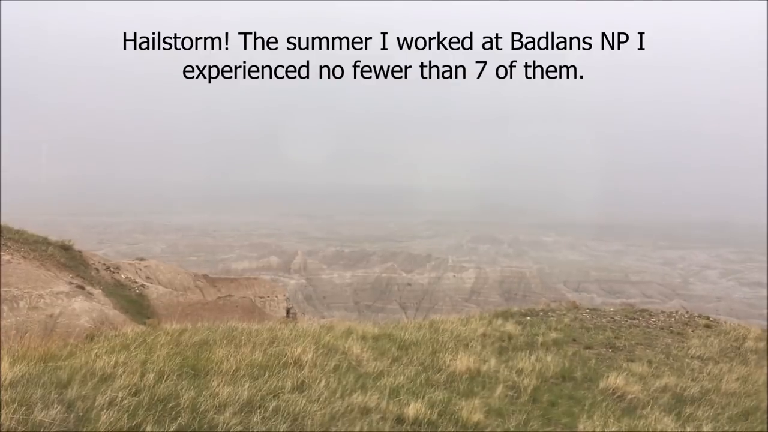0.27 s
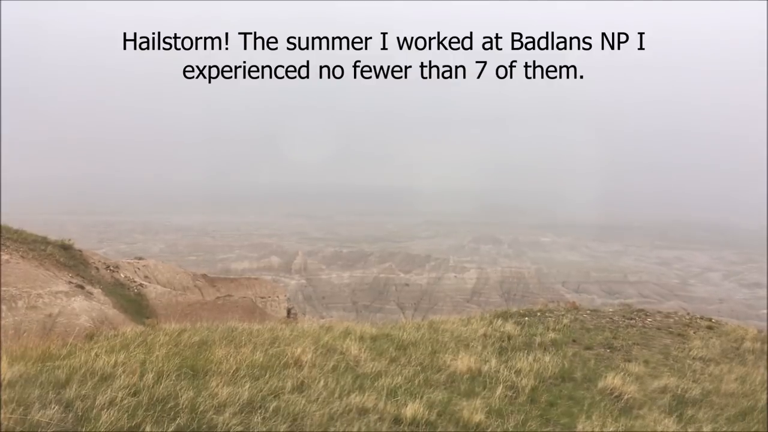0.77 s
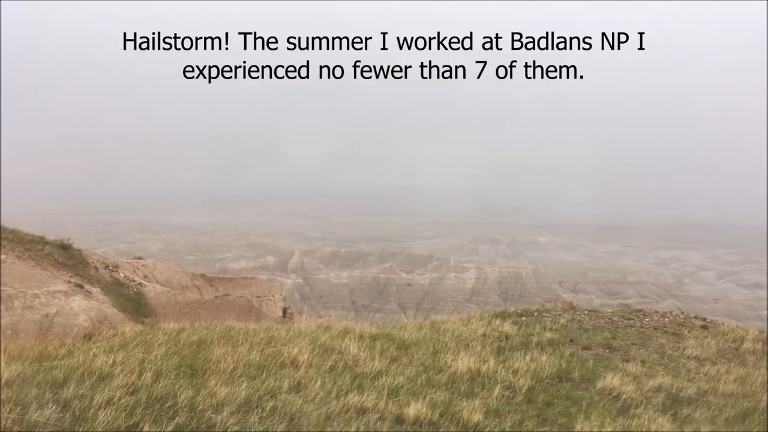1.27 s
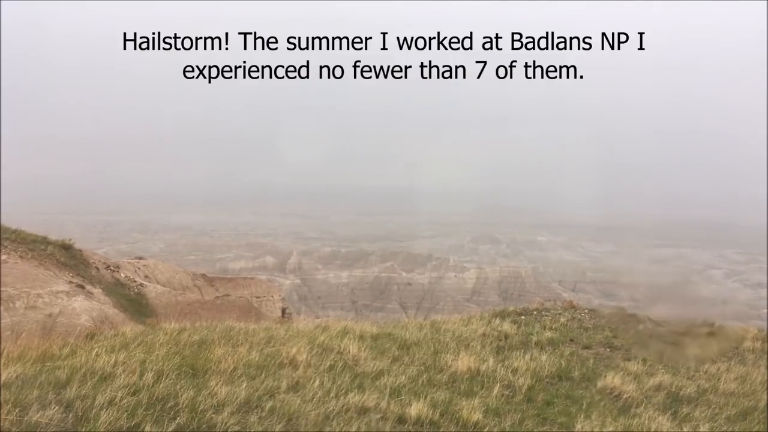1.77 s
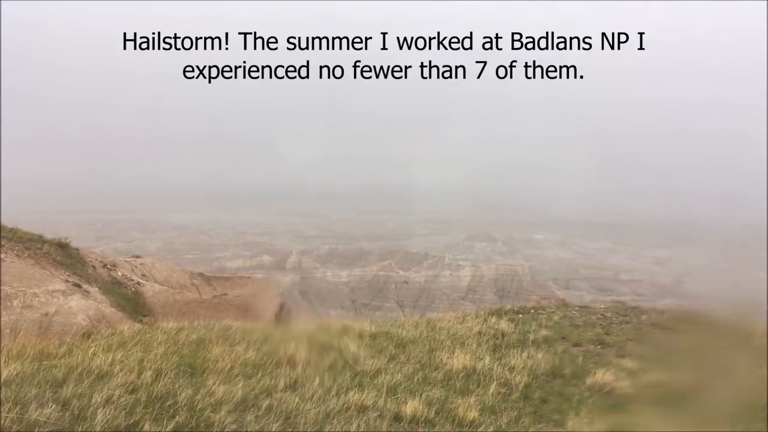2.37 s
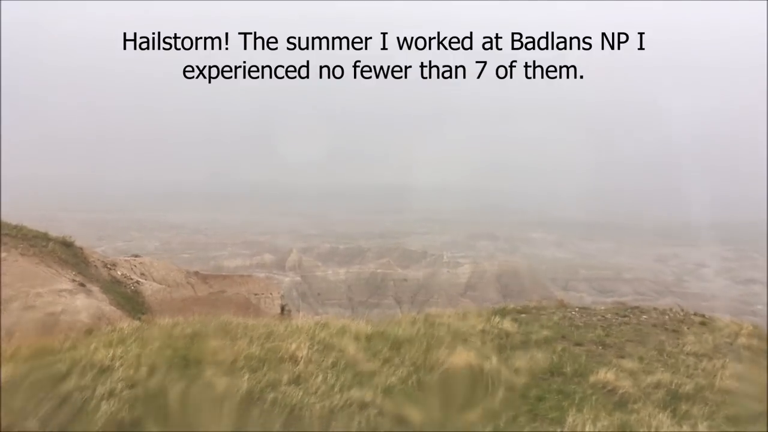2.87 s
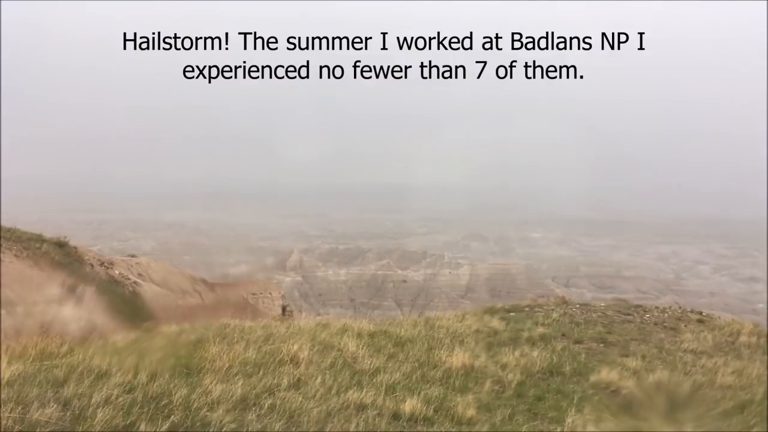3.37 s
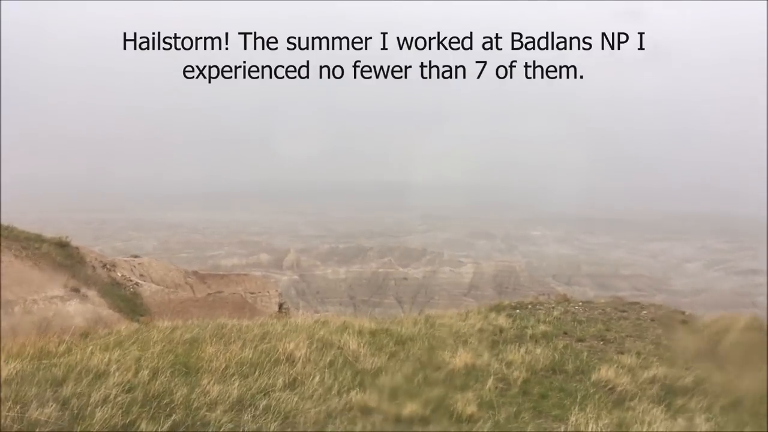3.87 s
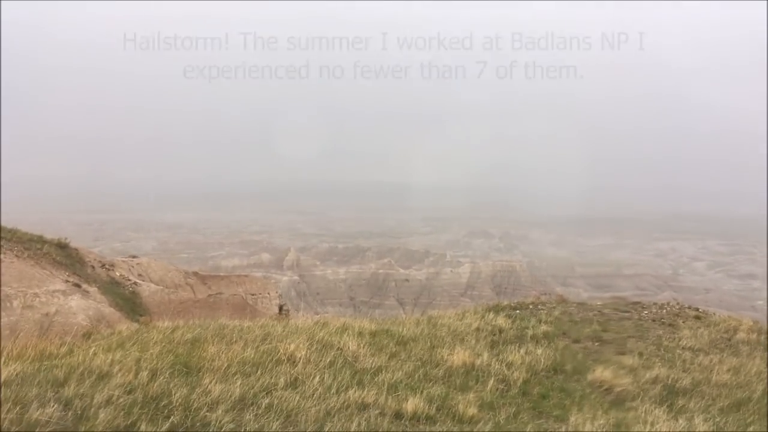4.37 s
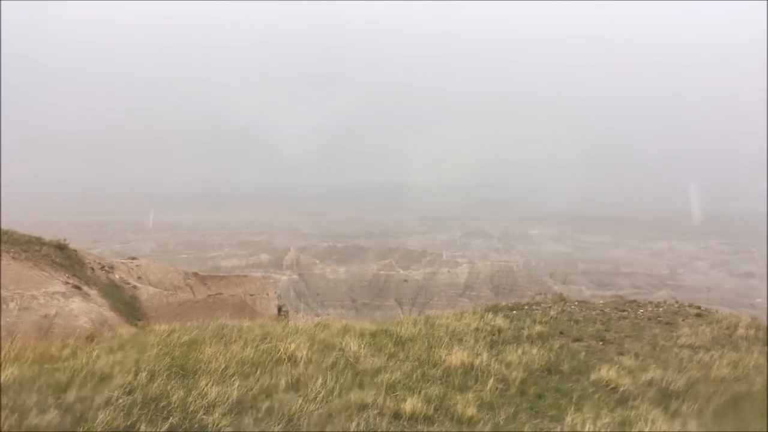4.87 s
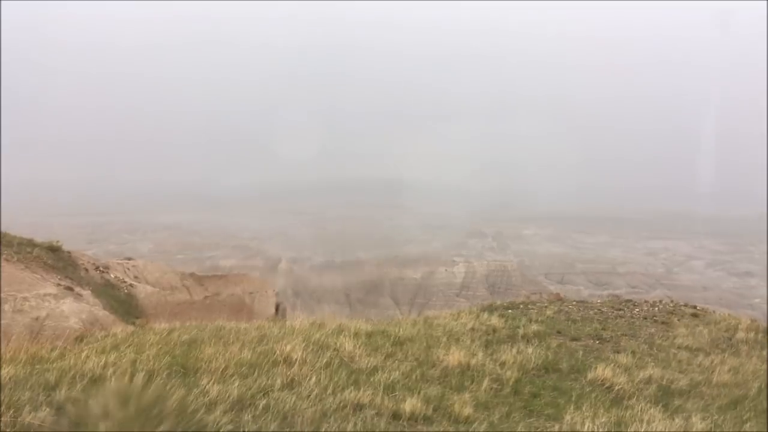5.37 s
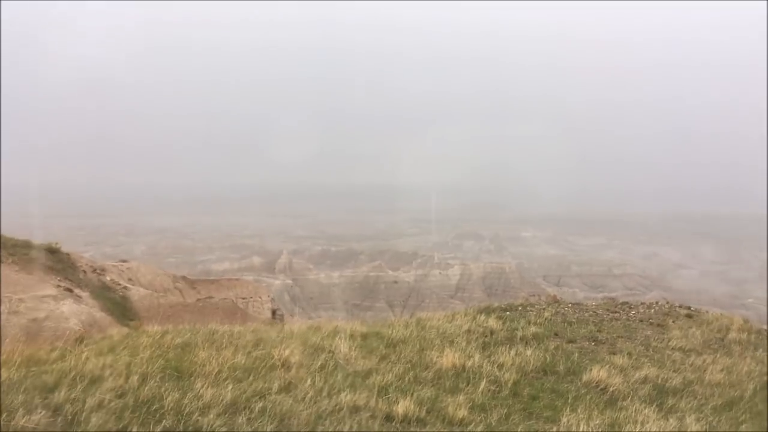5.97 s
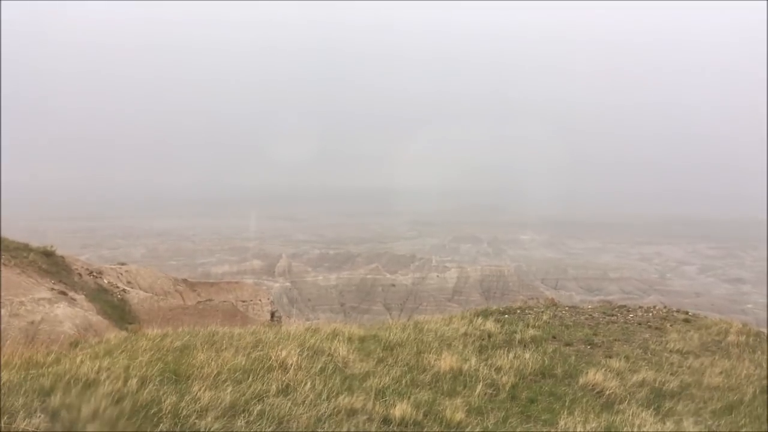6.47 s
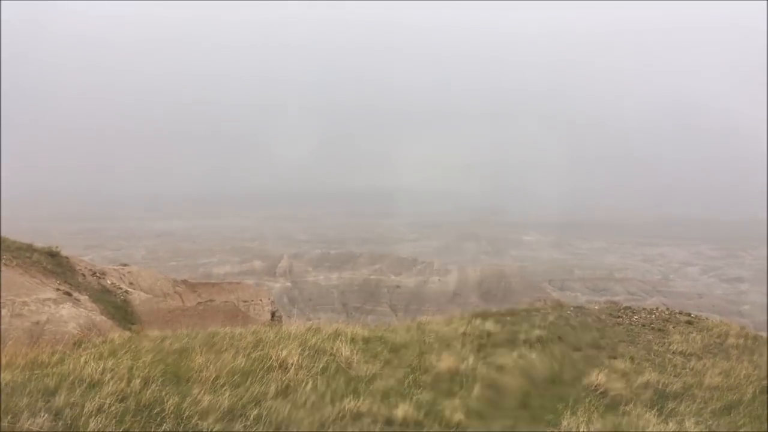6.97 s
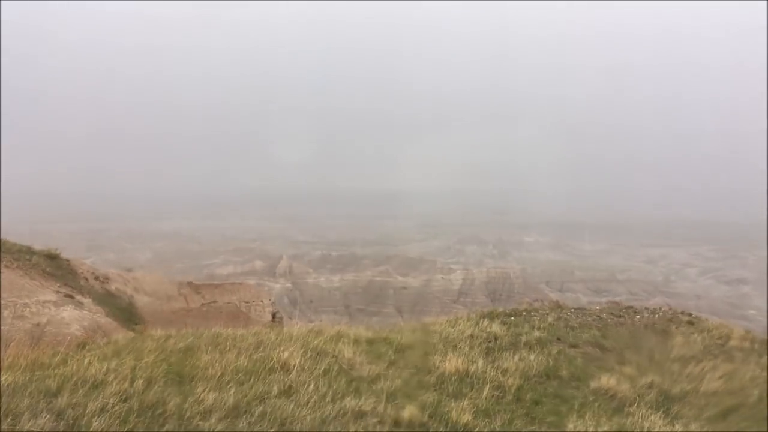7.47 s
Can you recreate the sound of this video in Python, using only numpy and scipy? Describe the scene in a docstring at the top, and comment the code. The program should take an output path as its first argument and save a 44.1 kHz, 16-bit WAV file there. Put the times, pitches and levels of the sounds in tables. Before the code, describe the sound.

Outdoors beside a hollow shelter, a dense patter of hail on grass is heard from the start, backed by a distant rustling wash and dull, low drumming with occasional thuds. Large hailstones soon strike close to the microphone in irregular clusters, tocking on turf and cracking brightly on harder spots. After several brief surges the hail thins and fades to a few faint ticks.

```python
"""Hail on a grassy ridge, heard from beside a hollow shelter. From the start, far stones merge into a
rustling wash over the slope, smaller ones patter a few metres off, and the shelter drums softly and
thuds now and then. Within half a second big stones are landing by the microphone with short, hard
tocks; some strike hard spots and crack sharply. The shower comes in flurries and slowly eases,
then dies away over the last two seconds."""
import sys
import numpy as np
from scipy import signal
from scipy.fft import rfft, irfft
from scipy.io import wavfile
from scipy.ndimage import uniform_filter1d

SR = 44100
rng = np.random.default_rng(int(sys.argv[2]) if len(sys.argv) > 2 else 0)


def wav_out(sig):
    """Save sig, one row per channel (or a flat mono array), as 16-bit PCM at SR to the path in sys.argv[1]."""
    wavfile.write(sys.argv[1], SR, np.round(np.clip(np.atleast_2d(sig).T, -1, 1) * 32767).astype(np.int16))


N = 340008
CENTRE_HZ = 3120  # pitch of a usual stone's tock


def undb(db):
    """Decibels to gain."""
    return 10 ** (np.asarray(db) / 20)


def unit(x):
    """Scale to rms 1."""
    return x / np.sqrt(np.mean(x ** 2))


def add(out, start_s, x):
    """Mix x into out from start_s on."""
    i = int(start_s * SR)
    out[i:i + len(x)] += x[:len(out) - i]


def ring(colour, stretch=1, size=1024):
    """Causal impulse response of a colour (freq_hz, level_db), its frequencies scaled by stretch."""
    hz, db = np.transpose(colour)
    bin_hz = np.maximum(np.arange(size // 2 + 1) * SR / size, 1)
    gain = undb(np.interp(np.log(bin_hz), np.log(hz * stretch), db))
    cepstrum = irfft(np.log(gain))
    cepstrum[1:size // 2] *= 2  # fold to minimum phase
    cepstrum[size // 2 + 1:] = 0
    return irfft(np.exp(rfft(cepstrum)))


def sound(force, response):
    """Let a force play through a response."""
    return signal.fftconvolve(force, response)[:len(force)]


def walk(rate_hz):
    """Slow drift: random levels held 1 / rate_hz seconds and smoothed twice."""
    hold = int(SR / rate_hz)
    steps = np.repeat(rng.standard_normal(N // hold + 1), hold)
    return unit(uniform_filter1d(uniform_filter1d(steps, hold), hold)[:N])


def impacts(per_s, spread_db, span=4):
    """Random impacts, most of them faint; the biggest lie span spreads above the smallest."""
    when, rarity, side = rng.random((3, N))
    size_db = -spread_db * np.log(rarity + np.exp(-span))
    return (when < per_s / SR) * undb(size_db) * np.sign(side - .5)


def contact(crush_s, scatter, scatter_s, size=2048):
    """Force of one landing: it builds as stalks are crushed, lets go, and the ground scatters it."""
    t = np.arange(1, size + 1) / SR
    stalks, ground = rng.standard_normal((2, size))
    stalks = stalks * np.abs(stalks) * np.sqrt(t) * np.exp(-t / crush_s)
    ground = ground * np.exp(-t / scatter_s)
    return stalks / np.linalg.norm(stalks) + scatter * ground / np.linalg.norm(ground)


def blow(force, response, size=260):
    """One hit, with rms 1 over its first few milliseconds."""
    x = sound(force, response)
    return x / np.sqrt(np.mean(x[:size] ** 2))


def shower(swell, dying, ease_db_per_s=0.59, fade_start_s=5.59, fade_end_s=8.41):
    """Gain of the easing hail; swell and dying set how strongly it follows flurries and final fade."""
    # flurries of thicker hail: centre_s, half_length_s, relative_swell_db
    flurries = [(0.244, 0.14, 4.5), (1.0, 0.28, 2.3), (1.604, 0.12, 1), (3.01, 0.17, 4), (3.904, 0.19, 4.5),
                (4.437, 0.24, 2.5), (5.262, 0.4, 2.5), (6.183, 0.085, 3)]
    t = np.arange(N) / SR
    flurry_db = sum(db * np.exp(-((t - centre_s) / half_s) ** 2) for centre_s, half_s, db in flurries)
    fade = np.clip((fade_end_s - t) / (fade_end_s - fade_start_s), 0, 1)
    return undb(swell * flurry_db - ease_db_per_s * t) * fade ** dying


def wash(per_s, spread_db, waver_db):
    """Countless far stones merge into a rustle that wavers a little."""
    # the whole slope from afar: freq_hz, level_db
    slope_colour = [(150, -1), (400, 4), (800, 5), (1100, 1.5), (1900, -2.5), (2450, -2.5), (3280, 1),
                    (3900, -10.5), (4900, -16), (5700, -21), (7100, -29), (10300, -28), (12700, -33),
                    (16000, -41)]
    rustle = unit(sound(impacts(per_s, spread_db), ring(slope_colour)))
    return rustle * undb(waver_db * walk(rate_hz=14))


def patter(per_s, spread_db, pitch_spread, patches=14):
    """Smaller stones on patches of turf, each with its own pitch; the grass between blurs the attack."""
    # hail on turf a few metres from the microphone: freq_hz, level_db
    turf_colour = [(300, -15), (1200, -8), (2000, -9.5), (2450, -4.5), (2850, 4), (3300, 6.5), (3900, -8),
                   (4900, -17.5), (5700, -15.5), (7100, -27.5), (8400, -39.5), (10300, -47), (12700, -44),
                   (16000, -34)]
    out = np.zeros(N)
    for patch in np.linspace(-1, 1, patches):
        force = contact(crush_s=0.0016, scatter=0.38, scatter_s=0.012)
        hit = blow(force, ring(turf_colour, stretch=1 + pitch_spread * patch))
        out += sound(impacts(per_s / patches, spread_db), hit)
    return unit(out)


def drumming(per_s, spread_db):
    """Stones on the shelter beside the microphone come through as a dense, dull drumming."""
    # the hollow shelter under hail: freq_hz, level_db
    shelter_colour = [(20, -33), (40, -17), (60, 1.5), (88, -1), (125, -1.5), (185, 0), (290, -4.5),
                      (350, -2), (440, -16), (560, -10), (800, -19.5), (2000, -56.5)]
    return unit(sound(impacts(per_s, spread_db), ring(shelter_colour, size=8192)))


def stone(level_db, pitch_hz, hard_db, crack_trim_db=-2.0):
    """One close stone tocks; a harder spot adds more knock from the soil and a louder, brighter crack."""
    # short ring of ice landing on turf: freq_hz, level_db
    tock_colour = [(100, -36), (1100, -31.5), (1900, -22), (2300, -11.5), (2550, -5), (2850, -8.5),
                   (3250, 0), (3650, -9.5), (4200, -21), (6000, -35), (12000, -59)]
    # the weight of a stone reaching the soil: freq_hz, level_db
    knock_colour = [(100, -9.5), (500, -4.5), (1050, -6.5), (1500, -4), (1850, 3), (2300, -1.5),
                    (3000, -12), (6000, -38)]
    # hard contact of ice on grit: freq_hz, level_db
    crack_colour = [(1500, -25), (3400, -6.5), (4400, 7.5), (5000, 1), (5800, 4), (7000, -10), (7700, -13),
                    (8300, -8.5), (9500, -12), (10300, -21.5), (11400, -14), (12800, -15.5), (13600, -15),
                    (16000, -23)]
    usual_tock_db, usual_hard_db, usual_knock_db = -40, -5.5, -10
    knock_per_db, cushion_per_db = 0.61, 0.5
    harder_db = hard_db - usual_hard_db
    tilt_db_per_octave = 0.05 * harder_db
    grit_hz, grit_db = np.transpose(crack_colour)
    grit_db = grit_db + tilt_db_per_octave * np.log2(grit_hz / CENTRE_HZ)
    grit = ring(np.column_stack([grit_hz, grit_db]))
    ice = ring(tock_colour, stretch=pitch_hz / CENTRE_HZ)
    tock = blow(contact(crush_s=0.00084, scatter=0.47, scatter_s=0.0049), ice)
    knock = blow(contact(crush_s=0.0015, scatter=0.49, scatter_s=0.015), ring(knock_colour))
    crack = blow(contact(crush_s=0.001, scatter=0.34, scatter_s=0.0073), grit)
    cushion_db = cushion_per_db * (level_db - usual_tock_db)  # the turf cushions big stones
    knock_db = usual_knock_db + knock_per_db * harder_db - cushion_db
    return undb(level_db) * (tock + undb(knock_db) * knock + undb(hard_db + crack_trim_db) * crack)


def small_stones(level_db, spread_db, pitch_spread, hard_db, hard_spread_db, count=110):
    """Lighter stones land close by at random moments, on soft and hard spots alike."""
    out = np.zeros(N)
    for slot, (jitter, size, pitch, spot) in enumerate(rng.uniform(-0.9, 1, (count, 4))):
        start_s = (slot + .5 + jitter / 2) / count * N / SR
        pitch_hz = CENTRE_HZ * (1 + pitch_spread * pitch)
        add(out, start_s, stone(level_db + spread_db * size, pitch_hz, hard_db + hard_spread_db * spot))
    return out


def thuds(push_s):
    """A heavy blow pushes the shelter for a few milliseconds and rings its modes."""
    # heavy blows on the shelter: start_s, level_db
    heavy_blows = [(0.137, -51.5), (0.278, -44), (0.625, -54.5), (0.872, -55), (1.211, -57), (1.651, -56),
                   (2.078, -52), (3.862, -55), (4.045, -55), (4.327, -55), (4.681, -56), (5.83, -62),
                   (6.18, -65)]
    # modes of the shelter: pitch_hz, relative_level_db, t60_s
    modes = [(60, -12, .25), (91.6, 1, 0.51), (185.4, 6, 0.23), (272, -7, 0.3), (340, -5, 0.23),
             (556, 5, 0.086)]
    t = np.arange(SR // 2) / SR
    body = sum(undb(db - 60 * t / t60_s) * np.sin(2 * np.pi * hz * t) for hz, db, t60_s in modes)
    body *= 1 - np.exp(-t / push_s)
    body /= np.sqrt(np.mean(body[:SR // 10] ** 2))
    out = np.zeros(N)
    for start_s, level_db in heavy_blows:
        add(out, start_s, undb(level_db) * body)
    return out


def big_stones(gain_db):
    """The big stones land right next to the microphone, each with its own pitch."""
    # landings and how hard a spot each one hits: start_s, relative_level_db, pitch_hz, hardness_db
    strikes = [(0.3949, -33.5, 3260, -2), (0.4066, -34, 3240, -1), (0.5571, -41.5, 3030, -26),
               (0.7012, -37, 3200, -17), (0.7098, -31.5, 2970, -1), (0.7213, -31.5, 3020, -27),
               (0.835, -41.5, 3140, -15), (0.841, -41, 2730, -4), (0.8788, -40.5, 3200, -21),
               (0.9472, -36.5, 3260, -8.5), (0.9922, -40, 3370, -6.5), (1.0571, -39.5, 3150, 0),
               (1.146, -37.5, 3260, -8), (1.2012, -46, 2950, -15), (1.382, -48, 3360, 5),
               (1.395, -44, 3060, -3.5), (1.469, -38, 3300, -23), (1.594, -33.5, 2980, -5.5),
               (1.6549, -39, 3150, -7.5), (1.677, -41, 2990, -8), (1.8702, -36, 3330, -7.5),
               (2.0872, -39.5, 2920, 0.5), (2.1645, -42, 3010, -16), (2.4118, -37, 3160, -8),
               (2.436, -31.5, 3330, -1.5), (2.486, -42, 3000, -5), (2.623, -37.5, 3560, -15),
               (2.9024, -38, 2950, -3), (3.0307, -42, 3320, -7.5), (3.0912, -37, 2820, -2.5),
               (3.1379, -32, 3070, -8), (3.1472, -38.5, 3270, -11), (3.2227, -38.5, 3150, -22),
               (3.2337, -40, 2850, -8), (3.2698, -39.5, 2840, -9.5), (3.324, -41.5, 3240, -8.5),
               (3.422, -35, 2950, -21), (3.717, -42, 2730, -7), (3.7424, -25.5, 2950, -15),
               (3.777, -40, 2940, -10), (3.8057, -37.5, 3200, -5.5), (3.8699, -39, 2900, -1.5),
               (3.875, -48, 3300, 1.5), (3.963, -39.5, 3380, -32), (4.0474, -40.5, 2800, 0.5),
               (4.1393, -36.5, 2840, -5), (4.1502, -44.5, 3430, -7), (4.2565, -41.5, 2930, -4),
               (4.3659, -40.5, 3100, -7), (4.372, -39.5, 3160, -10), (4.4032, -46, 3330, 1.5),
               (4.476, -42, 2980, -20), (4.53, -36, 3220, -12), (4.6852, -39, 3300, -3),
               (4.7543, -41.5, 3100, -17), (4.7646, -37, 2950, -27), (4.8907, -40.5, 3000, -0.5),
               (4.9134, -36.5, 3170, -1), (4.9456, -39.5, 2860, -7.5), (4.985, -38.5, 3200, -6),
               (4.9953, -37.5, 3120, -3.5), (5.0203, -51, 2920, 2.5), (5.305, -40.5, 2990, -8.5),
               (5.3937, -44, 3180, -8.5), (5.7494, -46, 3040, -0.5), (5.7708, -42.5, 3120, -4),
               (6.0703, -39.5, 3270, -7), (6.1333, -40, 2720, -22), (6.1502, -48.5, 3170, -4.5),
               (6.4709, -44.5, 3130, -4), (6.6305, -45, 3300, -3), (6.8474, -46, 3080, -8),
               (6.959, -45.5, 3260, -5.5), (6.991, -40.5, 3230, -5), (7.122, -49, 3450, -10.5),
               (7.1662, -50.5, 3180, -11.5)]
    out = np.zeros(N)
    for start_s, level_db, pitch_hz, hard_db in strikes:
        add(out, start_s, stone(level_db, pitch_hz, hard_db))
    return undb(gain_db) * out


def scene():
    """The ridge in mono: close stones in front, patter behind, the far slope, the shelter alongside."""
    big = big_stones(gain_db=0.72)
    small = small_stones(level_db=-47.5, spread_db=3.5, pitch_spread=0.054,
                         hard_db=-9.5, hard_spread_db=10.5)
    small *= shower(swell=0.95, dying=1.4)
    middle = undb(-52.5) * patter(per_s=320, spread_db=4.0, pitch_spread=0.034)
    middle *= shower(swell=1.35, dying=0.76)
    far = undb(-54.5) * wash(per_s=4000, spread_db=3.5, waver_db=1.66)
    far *= shower(swell=0.58, dying=1.18)
    shelter = undb(-52.5) * drumming(per_s=430, spread_db=2.5)
    shelter *= shower(swell=0.45, dying=1.19)
    shelter += thuds(push_s=0.0017)
    return (big + small + middle + far + shelter)[None]


def record(dry, hiss_db=-94, bass_hz=28, top_hz=15900):
    """The recorder adds a faint hiss, sheds the deepest bass and cuts the top."""
    x = dry + undb(hiss_db) * rng.standard_normal(dry.shape)
    x = signal.sosfilt(signal.butter(2, bass_hz, "high", fs=SR, output="sos"), x)
    return signal.sosfilt(signal.ellip(8, .2, 70, top_hz, fs=SR, output="sos"), x)


dry = scene()
out = record(dry)
wav_out(out)
```